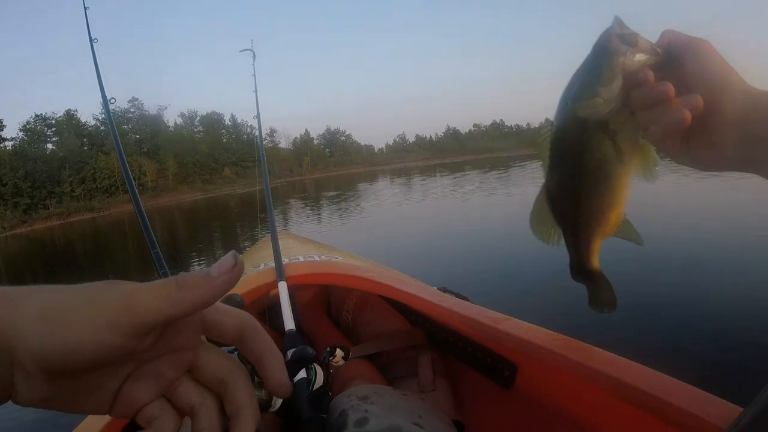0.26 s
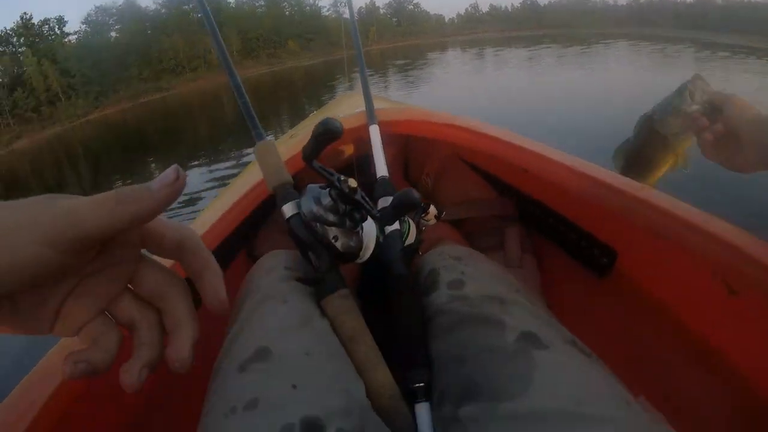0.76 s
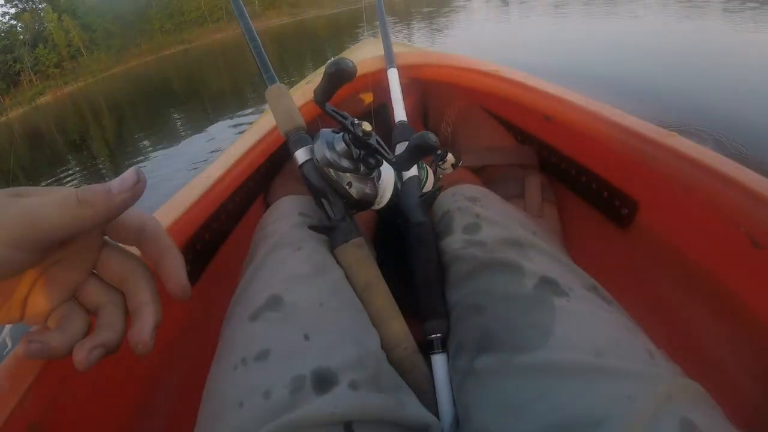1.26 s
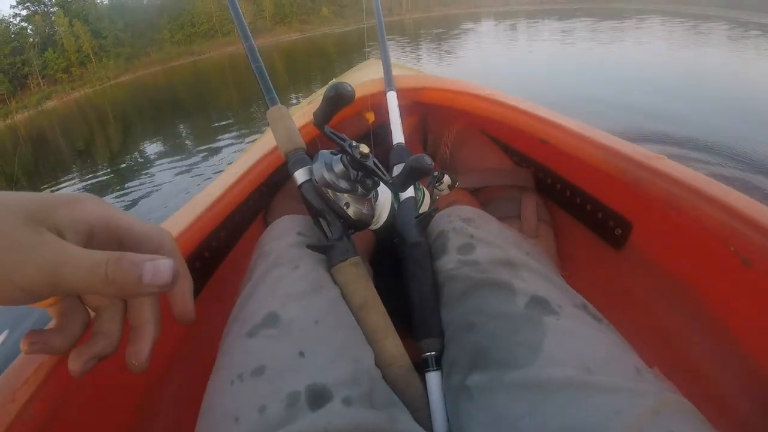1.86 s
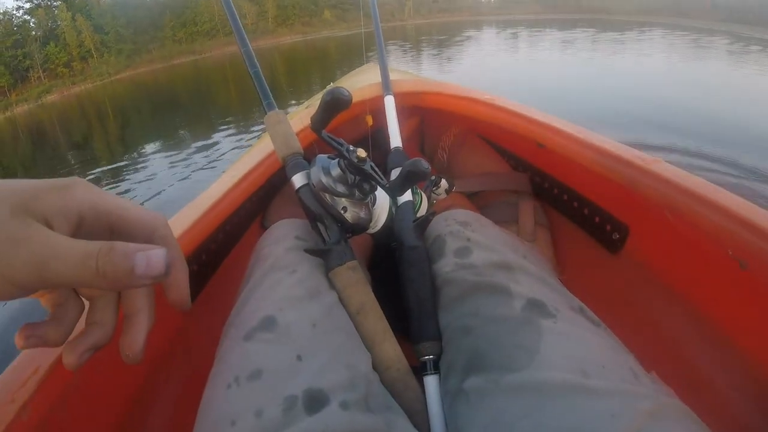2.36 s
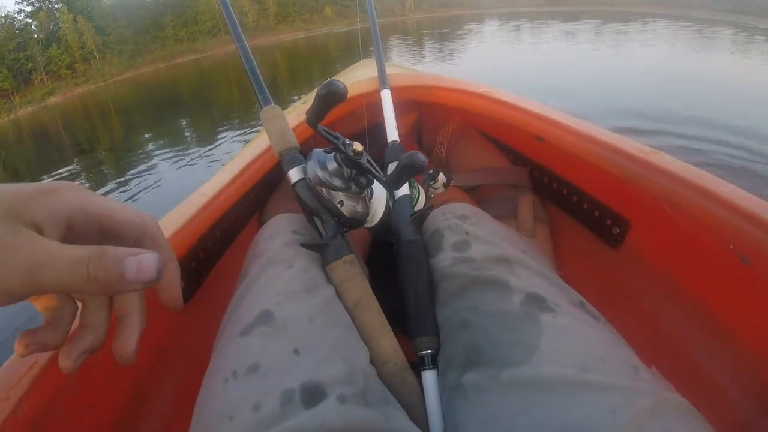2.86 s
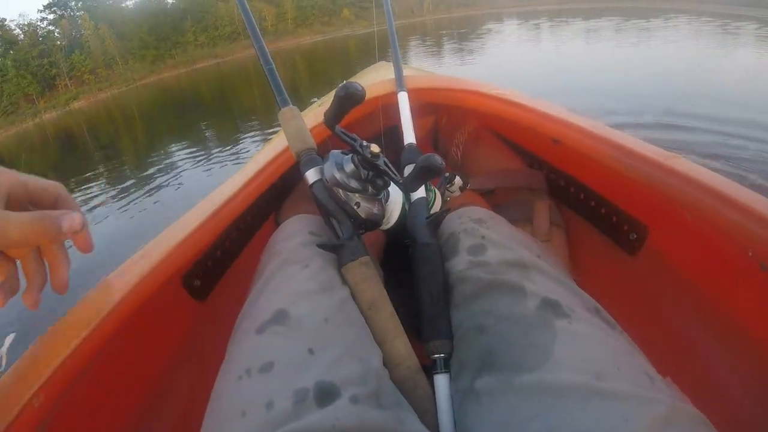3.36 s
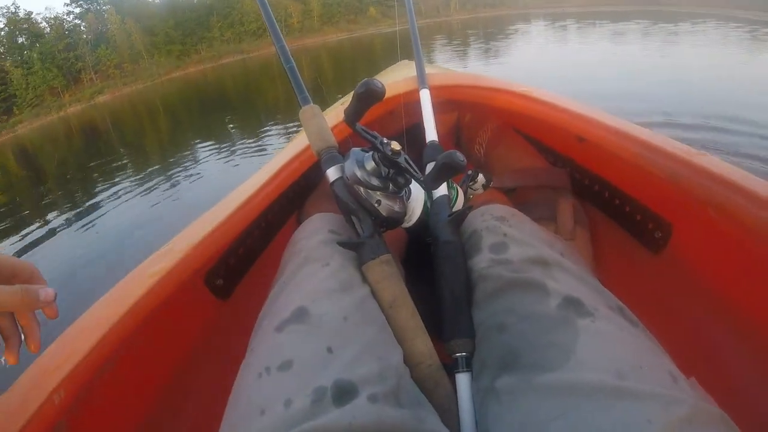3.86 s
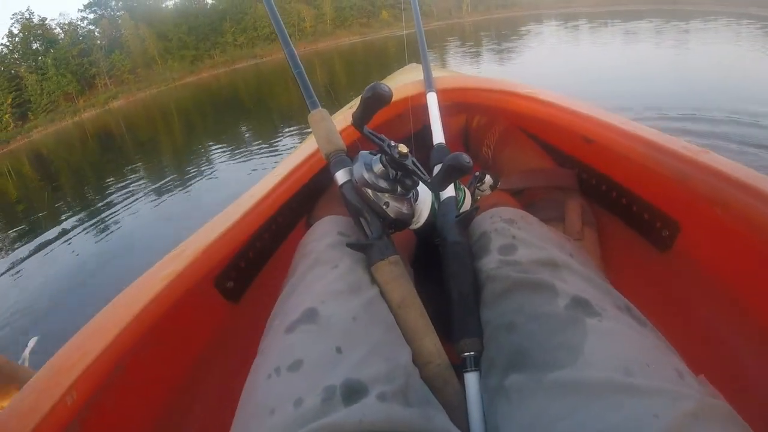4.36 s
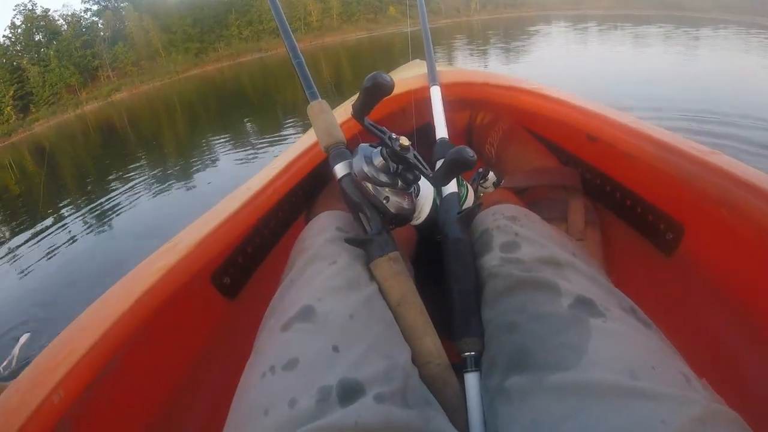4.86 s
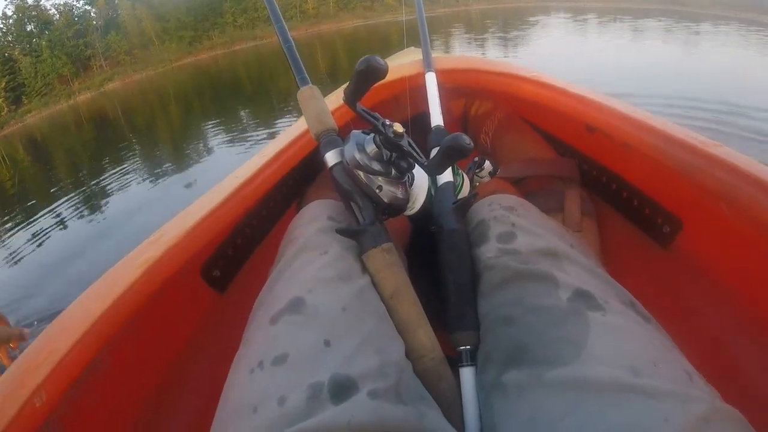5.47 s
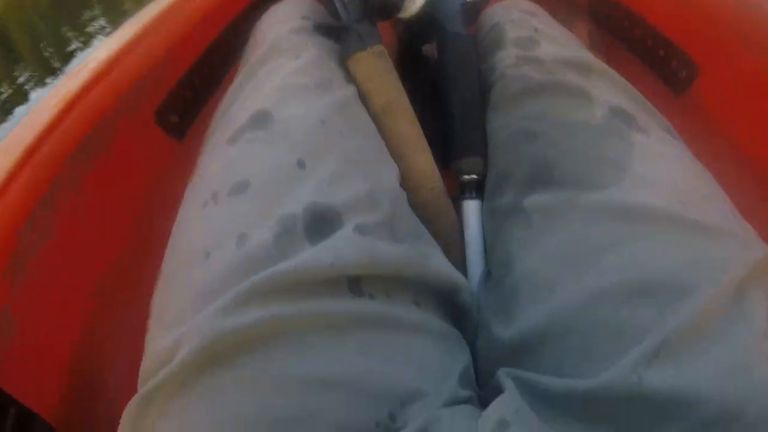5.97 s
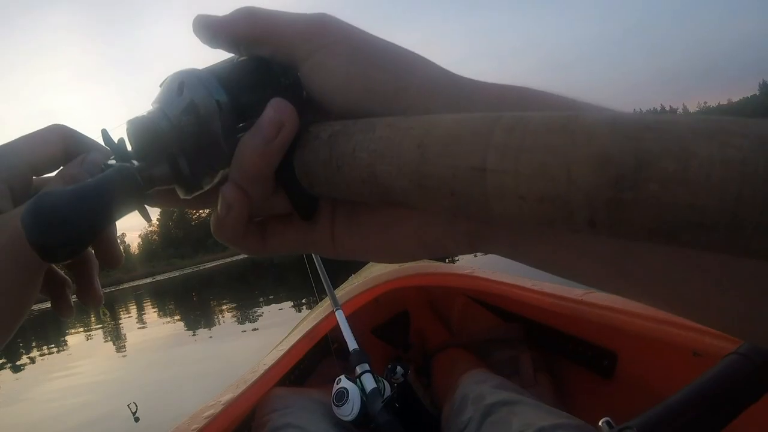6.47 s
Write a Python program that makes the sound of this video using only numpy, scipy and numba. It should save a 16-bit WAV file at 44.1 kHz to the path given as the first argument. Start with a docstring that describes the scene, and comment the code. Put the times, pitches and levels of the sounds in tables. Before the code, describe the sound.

On a calm lake, a chest-mounted microphone in a hard case catches dull bumps and strap rubbing, then water gurgling, drips and fine spatter as a fish is slipped back. Quiet spells alternate with small splashes. Near the end a hand grabs the case with taps, a huge thump and gritty scraping, cut off suddenly to faint hiss and thin insects.

```python
"""Water stirring in bubbles and drop ticks, bumps and rubbing on a camera case, then a grab with thumps and a scrape
that stops dead; hiss, far insects, thin hisses and breeze puffs lie under it. An angler in a kayak on a still lake
at dusk slips a fish back, the camera on the chest. Bubbles, drops and spray are gliding or decaying sines with noise
bursts; bumps are force pulses and rubs noise grains through case resonances; the rest is shaped noise.
A wind filter cuts the bass, then a compressor holds down the loudest thumps."""
import sys
import numpy as np
from scipy import signal
from scipy.fft import rfft, irfft
from scipy.io import wavfile
from scipy.ndimage import uniform_filter1d
from numba import njit

SR = 44100
rng = np.random.default_rng(int(sys.argv[2]) if len(sys.argv) > 2 else 0)


def persist_wave(psi):
    """Save psi, clipped to +-1, as 16-bit WAV."""
    counts = np.round(np.clip(psi, -1, 1) * 32767).astype(np.int16)
    wavfile.write(sys.argv[1], SR, np.atleast_2d(counts).T)


N = 295999
TIME_S = np.arange(N) / SR

# All levels are set ahead of the compressor; all but breeze and low rumble also pass the wind filter.
# Microphone and air noise spectrum. Each row: frequency in Hz, relative density in dB per Hz.
HISS_SPECTRUM = [(76, -33), (130, -3), (172, 1), (252, -8), (307, -8), (619, -49), (819, -20),
                 (2890, -27.5), (3530, -30), (4570, -41), (6960, -25), (8340, -25.5), (14600, -37),
                 (15500, -44)]
HISS_RMS_DB = -62
# Insect choruses. Each row: start in seconds, centre in Hz, width in Hz, throbs per second, depth 0-1, level in dB.
INSECTS = [(0, 3570, 200, 44, .4, -76), (6.17, 5330, 300, 78, .9, -75)]
# Straps dragging on the case. Each row: time in seconds, level in dB.
STRAP_DRAG = [(0, -34.5), (.07, -45), (.48, -50), (.58, -45), (.9, -46.5), (1.2, -53.5), (1.57, -50.5),
              (2.7, -53.5), (3.34, -49), (3.7, -52), (3.95, -47), (4.2, -46.5), (5.2, -51.5), (5.5, -44),
              (5.58, -33.5), (5.78, -36.5), (5.83, -31.5), (5.93, -32), (5.975, -24.5), (6.0, -56),
              (6.065, -26), (6.17, -42.5)]
# Shirt swishes. Each row: loudest moment in seconds, level in dB, swell in seconds, fade in seconds.
SHIRT_SWISHES = [(0, -51.5, .05, 0.21), (.95, -57, .1, .15), (4.05, -60, 0.14, 0.48),
                 (5.03, -57, 0.11, 0.19), (5.59, -45, 0.18, 0.1)]
# Cloth bands. Each row: centre in Hz, nominal width in Hz, gain in dB.
CLOTH_BANDS = [(2340, 940, 0.5), (4830, 780, -0.5), (8500, 2200, -11.5)]
# Bumps on the case. Each row: start in seconds, tap peak in dB, boom peak in dB.
BUMPS = [(0.011, -32, -28.5), (0.083, -32, -25.5), (0.133, -35, -28), (0.195, -32, -23.5),
         (0.269, -50, -33.5), (0.702, -36, -41), (0.83, -35, -40), (0.913, -24, -43), (0.945, -29, -51),
         (1.593, -34, -36), (3.005, -31.5, -28.5), (3.128, -29, -50), (3.135, -30.5, -48),
         (3.193, -36, -32), (3.292, -27.5, -39.5), (3.423, -28.5, -43), (3.433, -29.5, -30),
         (3.627, -34.5, -40), (3.666, -31, -35.5), (3.909, -30.5, -46), (3.969, -30, -36),
         (4.048, -28.5, -48), (4.1, -28.5, -35), (4.108, -32, -50), (4.17, -35, -34.5), (4.219, -34, -35),
         (4.343, -31.5, -42), (4.398, -34.5, -38), (4.596, -32.5, -40), (4.847, -33, -43), (4.95, -34, -51),
         (5.015, -34, -46), (5.066, -32.5, -50), (5.292, -32, -30), (5.305, -20.5, -24.5),
         (5.483, -27, -38), (5.68, -23, -32), (5.826, -20, -34), (5.85, -26, -47), (5.895, -11.5, -20),
         (5.9, -10, -20), (5.908, -8.5, -18), (5.911, -13, -21), (5.936, -18, 0), (5.952, -14, -12.5),
         (5.972, -30, -13), (5.9834, 6.5, 4.5), (6.052, -20, -12), (6.062, -14, -6)]
# Case resonances, low, middle and high. Each row: frequency in Hz, nominal width in Hz, gain in dB.
CASE_LOW = [(174.5, 50.4, 8.5), (253.5, 138, -3), (351, 254, -5.5), (454, 46, -13.5)]
CASE_MID = [(793, 570, -21), (1200, 1340, -32.5)]
CASE_HIGH = [(937, 80, 0), (1440, 90, -3), (2790, 120, -17), (5250, 400, -30)]
# Upper case resonances before the grip closes. Each row: frequency in Hz, nominal width in Hz, gain in dB.
GRIP_OPEN = [(960, 200, -4), (1530, 110, 0), (3120, 150, -16), (5500, 350, -27)]
# Loudest drops on water and hull. Each row: start in seconds, level in dB, ring in Hz.
DROPS = [(0.043, -36.5, 4750), (0.352, -46, 3700), (0.624, -45, 3180), (0.679, -44.5, 3300),
         (0.7275, -41, 2120), (0.7493, -37.5, 4860), (0.8764, -45, 4360), (0.8867, -49, 2050),
         (0.9428, -34.5, 1980), (0.9589, -24.5, 2080), (0.9724, -40, 2040), (1.0162, -39, 2550),
         (1.1268, -43.5, 2680), (1.2224, -52, 2000), (1.55, -42.5, 2890), (1.819, -45.5, 3140),
         (2.3568, -36, 2220), (2.4008, -45, 4270), (2.8403, -41, 2320), (3.1083, -39, 7900),
         (3.1224, -41.5, 1980), (3.1354, -35, 2500), (3.151, -37, 3650), (3.856, -37.5, 2820),
         (4.0196, -37.5, 2610), (4.0328, -34.5, 4630), (4.084, -35.5, 2030), (4.099, -37.5, 2400),
         (4.287, -47.5, 4320), (4.387, -45, 2390), (4.526, -37.5, 2600), (4.607, -35, 4800),
         (4.7135, -30.5, 4800), (4.727, -36.5, 3580), (4.75, -43.5, 2120), (4.789, -37.5, 2055),
         (4.834, -37, 4900), (4.9827, -29.5, 3140), (4.9977, -28.5, 4800), (5.0141, -32, 2110),
         (5.172, -34, 2500), (5.2148, -16.5, 4600), (5.2246, -28, 3620), (5.334, -37.5, 4780),
         (5.353, -40, 3530), (5.366, -43, 4900), (5.3847, -35.5, 6400), (5.42, -38, 4600),
         (5.445, -37, 3230), (5.8526, -28.5, 4700)]
# Stirs of the water. Each row: loudest moment in seconds, small-bubble level in dB, swell and fade in seconds.
STIRS = [(.75, -43.5, 0.017, .5), (.97, -35.5, 0.17, 0.31), (1.23, -42, 0.018, 0.034),
         (2.37, -44.5, .03, 0.36), (2.48, -44.5, 0.29, 0.09), (2.73, -54, 0.068, 0.024),
         (3.13, -26.5, 0.04, 0.021), (3.3, -49, 0.64, 0.059), (4.105, -24, 0.033, 0.014),
         (4.52, -50.5, .3, .2), (4.76, -53, .15, 0.18), (5.03, -41.5, 0.085, 0.25),
         (5.19, -35.5, 0.089, 0.78), (5.48, -44, 0.12, 0.24)]
# Loudest bubbles. Each row: start in seconds, start pitch in Hz, end pitch in Hz, length in ms, level in dB.
BUBBLES = [(0.7348, 1830, 1710, 3.4, -27), (0.7485, 1770, 1880, 8.6, -40), (0.8895, 313, 610, 38, -21.5),
           (0.9073, 2090, 1940, 12, -36.5), (0.926, 940, 1700, 13.4, -25), (0.953, 432, 520, 31, -33),
           (0.9547, 1460, 1460, 1.9, -22), (0.9725, 1610, 1520, 7.2, -23), (0.9975, 927, 960, 25, -36),
           (1.015, 560, 700, 31, -37), (1.0475, 1470, 1680, 11, -39), (1.0638, 960, 1280, 16, -40),
           (1.11, 850, 900, 14, -49), (1.1264, 1700, 1810, 3, -35.5), (1.2225, 1474, 1680, 2.3, -25),
           (1.223, 1030, 990, 3.2, -27), (2.3425, 676, 1550, 37, -42.5), (2.3522, 1630, 1430, 10, -30),
           (2.4011, 1174, 2220, 34, -34.5), (2.4525, 560, 654, 29, -35), (2.4895, 1180, 1130, 9, -38),
           (2.5335, 1610, 1510, 8.5, -43), (2.405, 420, 950, 28, -45), (2.56, 797, 1250, 35, -49),
           (2.6, 1005, 1450, 35, -52), (2.712, 730, 700, 21, -46.5), (2.8445, 824, 1200, 18, -36),
           (2.875, 1300, 1850, 20, -48.5), (2.915, 1400, 1450, 6, -48), (3.059, 1610, 1690, 7, -42.5),
           (3.0915, 1450, 1560, 19, -43), (3.157, 424, 400, 11, -32), (3.315, 1000, 950, 8, -45.5),
           (3.8626, 1594, 1420, 14, -35), (3.9983, 730, 960, 6.1, -31), (4.0357, 1635, 1570, 10.6, -28.5),
           (4.114, 1960, 2040, 2.5, -39), (4.116, 1450, 1490, 9, -37), (4.4074, 1120, 1120, 11, -40),
           (4.4815, 2310, 2330, 10, -42), (4.548, 790, 900, 25, -42.5), (4.6197, 1470, 1610, 4.4, -36.5),
           (4.7893, 2120, 1980, 10.7, -37.5), (4.8105, 766, 1046, 42, -38.5), (5.0355, 1660, 1660, 6, -40),
           (5.0475, 1310, 1560, 7, -39), (5.174, 980, 970, 1.7, -20), (5.175, 1400, 1370, 7.9, -28),
           (5.1983, 1650, 1790, 16, -40), (5.2169, 675, 690, 7, -21.5), (5.238, 1340, 1300, 5, -33),
           (5.2577, 924, 1510, 38, -31), (5.284, 1606, 1700, 22, -37.5), (5.3335, 1370, 1580, 9, -42),
           (5.4335, 1220, 1130, 5, -35.5), (5.4355, 1830, 1770, 4, -35), (5.4465, 1000, 1130, 17, -34.5),
           (5.4752, 1710, 2100, 6.8, -33), (5.4892, 928, 1505, 28, -28.5)]
# Thin hisses: a faint whistle, then two narrow hiss bands.
# Each row: start and length in seconds, start and end pitch in Hz, half-width in Hz, level in dB.
THIN_HISSES = [(2.41, .13, 4050, 4340, 30, -71), (4.04, .18, 4700, 4720, 60, -66),
               (4.07, .14, 5300, 5300, 90, -69)]
# Mount creaks. Each row: start and length in seconds, start and end pitch in Hz, half-width in Hz, level in dB.
CREAKS = [(5.82, 0.069, 420, 329, 27, -24), (5.64, 0.059, 510, 482, 86, -36)]
# The grabbing hand. Each row: time in seconds, scrape level in dB, low rumble level in dB.
GRAB = [(5.8, -60, -75), (5.885, -39, -70), (5.9, -23.5, -68), (5.925, -31.5, -54), (5.97, -27.5, -26),
        (6.0, -35, -22), (6.07, -30.5, -27.5), (6.1, -27, -28), (6.168, -30, -41.5)]

GRIP_CLOSE_S, GRAB_END_S = 5.99, 6.169
BREEZE_HZ, BREEZE_DB, BREEZE_TOP_HZ = 33.5, -69.5, 40
BUBBLE_FADE_DB = -11.5  # over the length of a bubble
SPLASH_DB, SPLASH_DB_PER_OCTAVE = -4, -8.5  # at a 2 kHz ring; higher rings splash less
SWELL_DB = 21.5  # gained over a swell, lost over a fade
WIND_CUT_HZ, TOP_HZ = 128, 15500
COMPRESS_DB, RELEASE_S = -10, 0.046


def undb(db):
    """Amplitude ratio of a level in dB."""
    return 10 ** (np.asarray(db) / 20)


def unit(x):
    """Scale to an RMS of 1."""
    return x / np.sqrt(np.mean(x ** 2))


def band(x, hz, width_hz):
    """Two-pole resonance, gain 1 at the centre."""
    return signal.lfilter(*signal.iirpeak(hz, hz / width_hz, SR), x)


def ring(x, modes):
    """Resonances in parallel."""
    return sum(undb(db) * band(x, hz, width_hz) for hz, width_hz, db in modes)


def steep(x, modes):
    """Resonances in parallel, each applied twice at 1.99 times its nominal width: dark valleys between modes."""
    out = 0
    for hz, width_hz, db in modes:
        once = band(x, hz, 1.99 * width_hz)
        out = out + undb(db) * band(once, hz, 1.99 * width_hz)
    return out


def walk(rate_hz):
    """Slow random drift around 0: values held 1 / rate_hz seconds, smoothed twice."""
    k = int(SR / rate_hz)
    held = np.repeat(rng.standard_normal(N // k + 1), k)
    return 1.3 * uniform_filter1d(uniform_filter1d(held, k), k)[:N]


def curve(table, column):
    """Gain along one dB column, straight in dB between rows, silent outside the table."""
    rows = np.array(table)
    return undb(np.interp(TIME_S, rows[:, 0], rows[:, column], -150, -150))


def swells(table):
    """Gain of gestures that swell to their loudest moment and fade; each reaches out to twice its swell and fade."""
    out = np.zeros(N)
    for s, db, swell_s, fade_s in table:
        away = np.where(TIME_S < s, (s - TIME_S) / swell_s, (TIME_S - s) / fade_s)
        out += undb(db - SWELL_DB * away) * (away < 2)
    return out


def grit(scatter_db, grain_ms):
    """Noise in short, soft-edged grains of uneven size, RMS 1."""
    k = int(grain_ms * SR / 1000) + 1
    sizes = np.repeat(rng.exponential(size=N // k + 1), k)[:N]
    return unit(rng.standard_normal(N) * undb(scatter_db * uniform_filter1d(sizes, k)))


def push(ms):
    """Smooth force pulse of one contact."""
    force = np.zeros(4000)
    k = max(int(ms * SR / 1000), 4)
    force[:k] = -np.sin(np.pi * np.arange(k) / k) ** 2
    return force


def add(out, s, x):
    """Mix x into out from s seconds on."""
    i = int(s * SR)
    out[i:i + len(x)] += x[:N - i]


def hiss():
    """Smooth noise of the microphone and the air above 600 Hz, wavering slightly."""
    hz = np.maximum(np.arange(N // 2 + 1) * SR / N, 1)
    rows = np.array(HISS_SPECTRUM)
    gain = undb(np.interp(np.log(hz), np.log(rows[:, 0]), rows[:, 1]))
    noise = irfft(rfft(rng.standard_normal(N)) * gain * (hz > 600), N)
    return unit(noise) * undb(HISS_RMS_DB + .5 * walk(2.9))


def insects():
    """Steady choruses in narrow noise bands, throbbing with the wing strokes."""
    out = np.zeros(N)
    for start_s, hz, width_hz, throb_hz, depth, db in INSECTS:
        throb = 1 + depth * np.sin(2 * np.pi * throb_hz * TIME_S + .5 * walk(6.3))
        song = unit(band(band(rng.standard_normal(N), hz, width_hz), hz, 2 * width_hz))
        out += undb(db + 0.87 * walk(4.7)) * throb * song * (TIME_S > start_s)
    return out


def breeze():
    """Slow pressure puffs of a light breeze: low-passed noise around one low resonance."""
    soft = signal.butter(6, BREEZE_TOP_HZ, fs=SR, output="sos")
    puff = unit(signal.sosfilt(soft, band(rng.standard_normal(N), BREEZE_HZ, 25)))
    return puff * undb(BREEZE_DB + 4.0 * walk(4.83))


def strap_rub():
    """Stick-slip grains under the straps excite the case modes."""
    drag = unit(steep(grit(0.83, 5.0), CASE_LOW + CASE_MID))
    return drag * undb(0.93 * walk(22)) * curve(STRAP_DRAG, 1)


def rustle():
    """Dry cloth: dense grains in wide bands, dulled at the top."""
    cloth = steep(grit(3.5, 1.5), CLOTH_BANDS)
    cloth = signal.lfilter(*signal.butter(3, 10500, fs=SR), cloth)
    return unit(cloth) * swells(SHIRT_SWISHES)


def bumps(high_db=-6.0, ring_db=-2.0, boom_ms=3.58, soft_ms=1.49, hard_ms=0.52):
    """A short tap, with a shorter contact for a harder blow, and the slower boom of the lowest case mode."""
    out = np.zeros(N)
    boom = steep(push(boom_ms), CASE_LOW[:1])
    boom = boom / np.abs(boom).max()
    for s, tap_db, boom_db in BUMPS:
        contact_ms = soft_ms - hard_ms * min(undb(tap_db), 1)
        force = push(contact_ms)
        modes = ring(force, CASE_LOW[1:]) + undb(high_db) * ring(force, CASE_HIGH[:2])
        tap = band(force, 550 / contact_ms, 600 / contact_ms) + undb(ring_db) * modes
        tap = tap / np.abs(tap).max()
        add(out, s, undb(tap_db) * tap + undb(boom_db) * boom)
    return out


def drop_ticks(decay_cycles=6.4, crack_ms=0.56, splash_ms=3.6, splash_hz=1400):
    """A drop: a wide crack, a few cycles of ring and a duller splash, all decaying exponentially."""
    out, u = np.zeros(N), np.arange(600) / SR
    noise = rng.standard_normal((len(DROPS), 2, len(u)))
    for (s, db, hz), (crack_noise, splash_noise) in zip(DROPS, noise):
        tone = np.sin(2 * np.pi * hz * u) * np.exp(-u * hz / decay_cycles)
        crack = unit(band(band(crack_noise, 4500, 6000), 3800, 8000)) * np.exp(-u * 1000 / crack_ms)
        splash = unit(steep(splash_noise, [(splash_hz, 1200, 0)])) * np.exp(-u * 1000 / splash_ms)
        splash_db = SPLASH_DB + SPLASH_DB_PER_OCTAVE * np.log2(hz / 2000)
        add(out, s, undb(db) * (0.72 * tone + 0.55 * crack + undb(splash_db) * splash))
    return signal.lfilter(*signal.butter(3, 7500, fs=SR), out)  # the case dulls the top


def droplets(low_hz=800, octaves=1.8, scatter_db=19.5, count=3000):
    """A crowd of small bubbles, decaying sines of rising pitch, follows the stirring; high ones are weaker."""
    stir = swells(STIRS)
    out, u = np.zeros(N), np.arange(1000) / SR
    decay_cycles, glide_per_s = 8.0, 10.0
    edge = (1 - np.exp(-u / 0.00017)) * np.cos(np.pi * u / u[-1] / 2)
    for s, pitch, size, rise in rng.random((count, 4)) * [N / SR, 1, 1, 1]:
        level = stir[int(s * SR)]
        if level > 1e-5:
            hz = low_hz * 2 ** (octaves * pitch ** 1.5)
            tone = np.sin(2 * np.pi * hz * u * (1 + glide_per_s * rise * u))
            grain = edge * tone * np.exp(-u * hz / decay_cycles)
            add(out, s, level * undb(-scatter_db * size - 6.0 * pitch) * grain)
    return out


def spray(level_db=-14.0, scatter_db=20.0, decay_cycles=5.9, count=1100):
    """Fine spatter: very short high ticks that follow the stirring, less steeply than the small bubbles."""
    stir = swells(STIRS)
    out, u = np.zeros(N), np.arange(200) / SR
    for s, pitch, size in rng.random((count, 3)) * [N / SR, 1, 1]:
        hz = 3000 * 2 ** (1.2 * pitch)
        shape = np.exp(-u * hz / decay_cycles) * (1 - np.exp(-u / 0.00019))
        tick = np.sin(2 * np.pi * hz * u) * shape
        add(out, s, stir[int(s * SR)] ** 0.8 * undb(level_db - scatter_db * size) * tick)
    return out


def bubbles(rise_ms=0.16, tail_ms=3.8):
    """Each bubble rings as a fading sine whose pitch moves ever faster, mostly up, as it nears the surface."""
    out = np.zeros(N)
    for s, start_hz, end_hz, length_ms, db in BUBBLES:
        u_ms = np.arange(int((length_ms + 15) * SR / 1000)) * 1000 / SR
        hz = start_hz * (end_hz / start_hz) ** np.minimum((u_ms / length_ms) ** 1.88, 1.5)
        attack = 1 - np.exp(-u_ms / rise_ms)
        fade = undb(BUBBLE_FADE_DB * u_ms / length_ms)
        tail = np.exp(-np.maximum(u_ms - length_ms, 0) / tail_ms)
        add(out, s, undb(db) * attack * fade * tail * np.sin(2 * np.pi * np.cumsum(hz) / SR))
    return out


def thin_hisses_and_creaks():
    """Thin hisses and mount creaks: narrow noise bands on a steady or gliding carrier that swell and fade."""
    out = np.zeros(N)
    for s, length_s, start_hz, end_hz, half_width_hz, db in THIN_HISSES + CREAKS:
        u = np.linspace(0, 1, int(length_s * SR))
        noise = rng.standard_normal((2, len(u) + 2000))
        waver = signal.lfilter(*signal.butter(2, half_width_hz, fs=SR), noise)[:, 2000:]  # drop the filter's onset
        phase = 2 * np.pi * np.cumsum(start_hz + (end_hz - start_hz) * u) / SR
        tone = unit(waver[0] * np.sin(phase) + waver[1] * np.cos(phase))
        add(out, s, undb(db) * np.sin(np.pi * u) ** .5 * tone)
    return out


def grab_scrape():
    """Stick-slip grains under the hand excite the case; its upper modes drop as the grip closes."""
    hand = grit(1.1, 4.0)
    is_open = TIME_S < GRIP_CLOSE_S
    upper = np.where(is_open, unit(steep(hand, GRIP_OPEN)), unit(steep(hand, CASE_HIGH)))
    lower = unit(steep(hand, [(1040, 400, -19), (497, 79, 21)]))
    return (upper + undb(-9) * lower) * curve(GRAB, 1)


def grab_rumble():
    """Low rumble noise under the grab."""
    return unit(steep(rng.standard_normal(N), [(50, 156, 0)])) * curve(GRAB, 2)


def faint_grit():
    """Faint noise grains through the case modes."""
    return undb(-50) * unit(steep(grit(2.35, 1.9), CASE_LOW + CASE_MID))


def scene():
    """Mix all layers: case contact stops dead at the end of the grab and faint grit follows."""
    held = TIME_S < GRAB_END_S
    contact = np.where(held, strap_rub() + bumps() + grab_scrape(), faint_grit())
    water = drop_ticks() + droplets() + spray() + bubbles()
    sound = hiss() + insects() + rustle() + contact + water + thin_hisses_and_creaks()
    # the wind filter takes out the bass; only puffs and rumble get under it
    wind_filter = signal.butter(7, WIND_CUT_HZ, "high", fs=SR, output="sos")
    return (signal.sosfiltfilt(wind_filter, sound) + breeze() + grab_rumble())[None]


@njit
def follow(x, release):
    """Peak level that jumps up and sinks exponentially."""
    e, y = 0., np.empty(len(x))
    for i in range(len(x)):
        e = max(abs(x[i]), e * release)
        y[i] = e
    return y


def record(dry):
    """A 2:1 compressor ducks the loud thumps and what follows closely; peaks clip and the top is cut."""
    level = follow(dry[0], np.exp(-1 / (RELEASE_S * SR)))
    gain = np.minimum(undb(COMPRESS_DB) / (level + 1e-9), 1) ** .5
    gain = uniform_filter1d(gain, 200, origin=99)  # mean of the last 200 samples
    top_cut = signal.ellip(10, .2, 70, TOP_HZ, fs=SR, output="sos")
    return signal.sosfilt(top_cut, np.clip(dry * gain, -.96, .96))


dry = scene()
out = record(dry)
persist_wave(out)
```